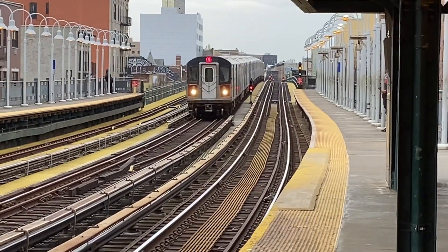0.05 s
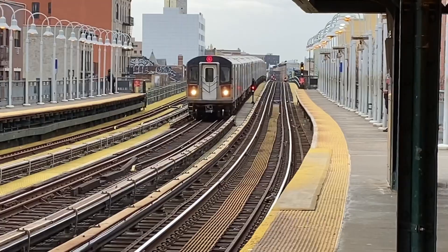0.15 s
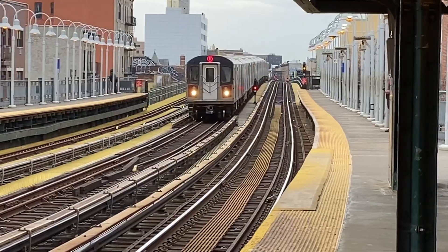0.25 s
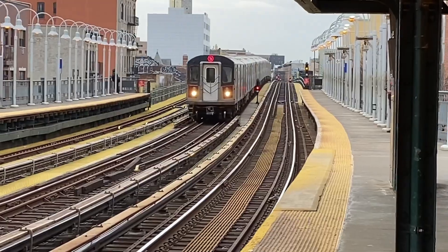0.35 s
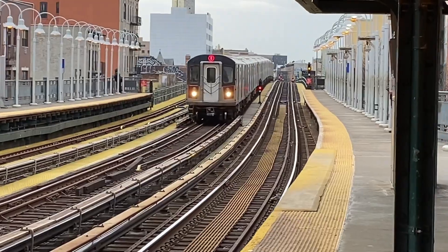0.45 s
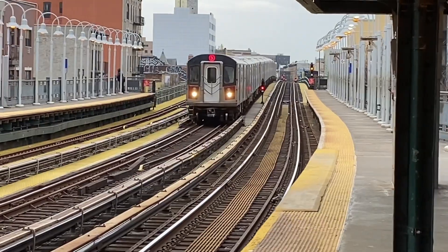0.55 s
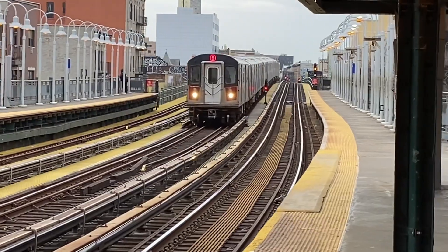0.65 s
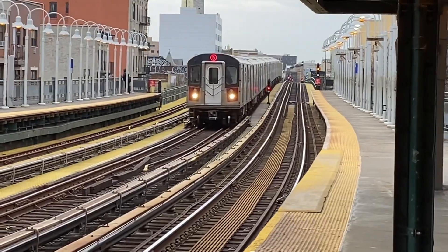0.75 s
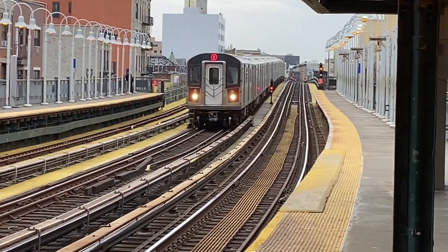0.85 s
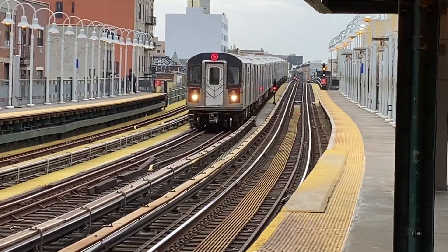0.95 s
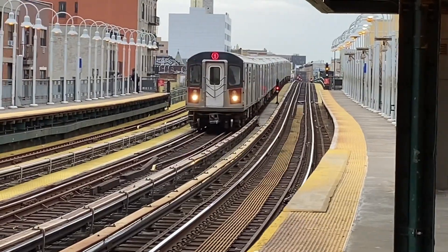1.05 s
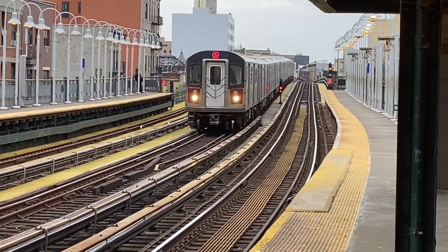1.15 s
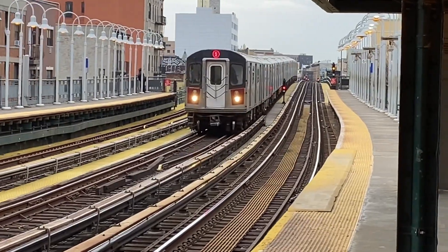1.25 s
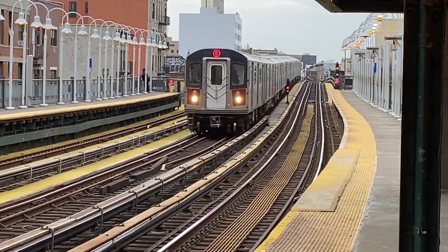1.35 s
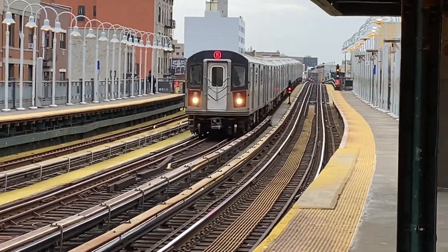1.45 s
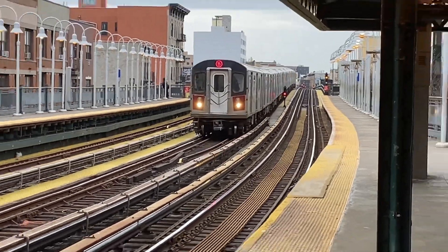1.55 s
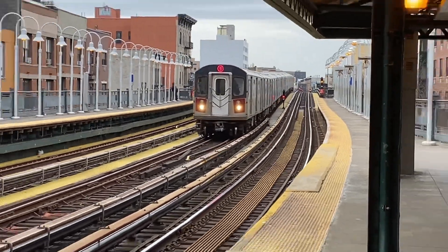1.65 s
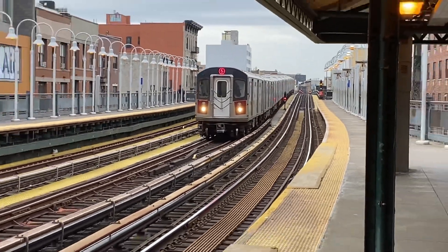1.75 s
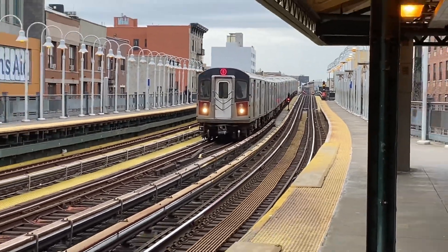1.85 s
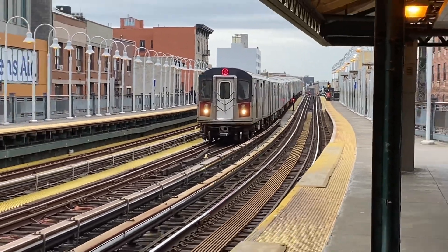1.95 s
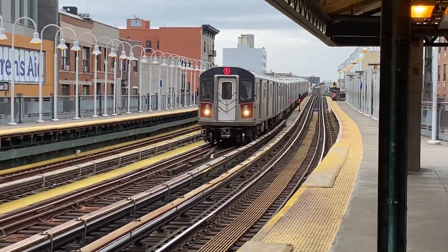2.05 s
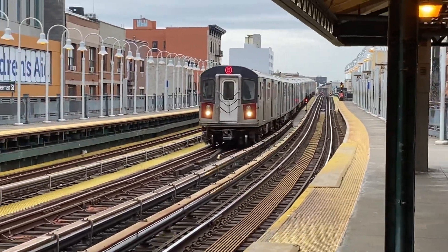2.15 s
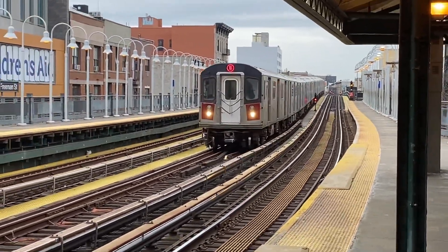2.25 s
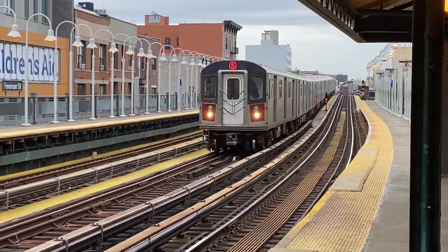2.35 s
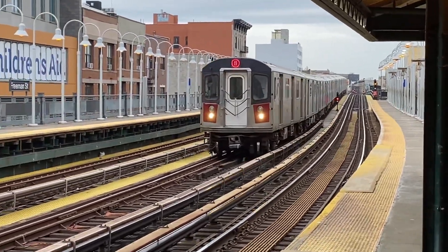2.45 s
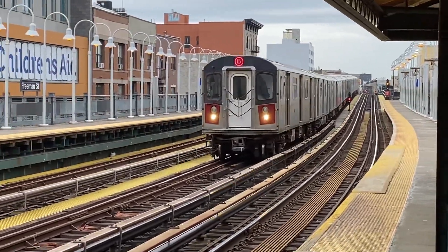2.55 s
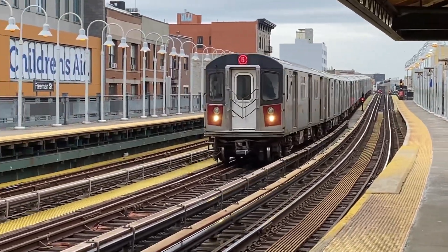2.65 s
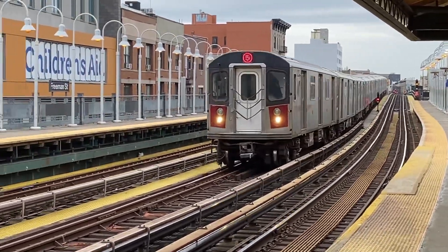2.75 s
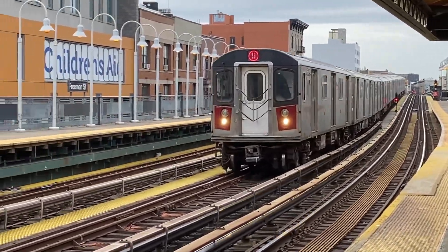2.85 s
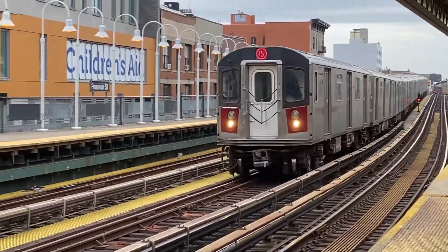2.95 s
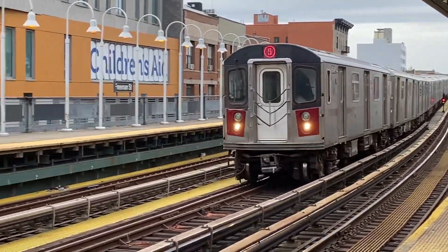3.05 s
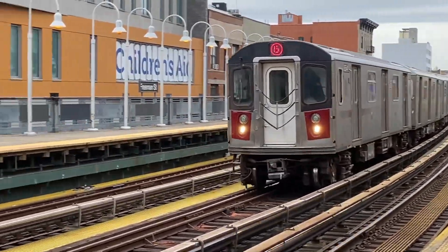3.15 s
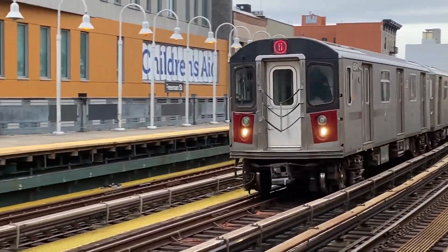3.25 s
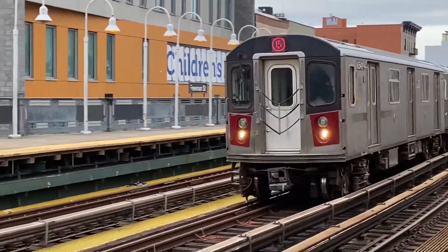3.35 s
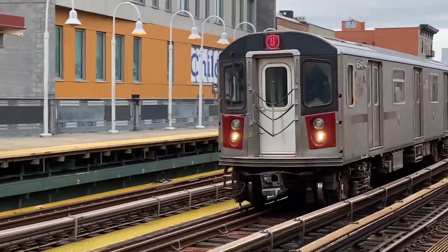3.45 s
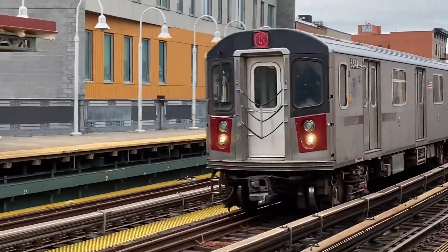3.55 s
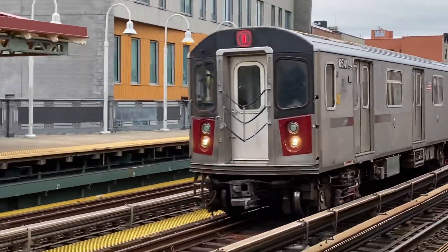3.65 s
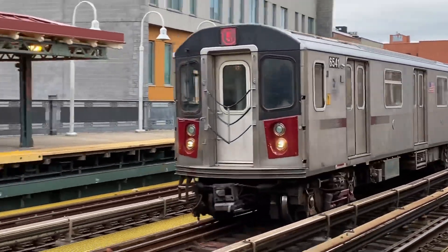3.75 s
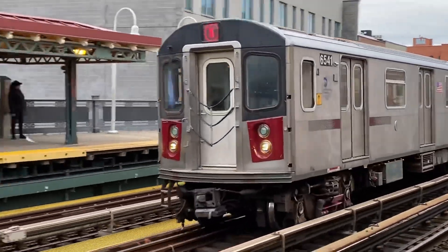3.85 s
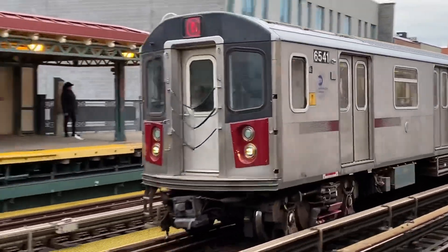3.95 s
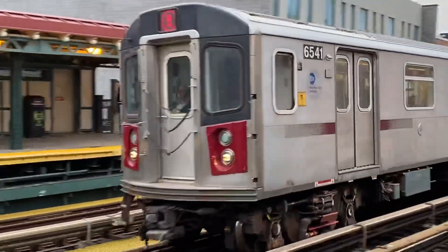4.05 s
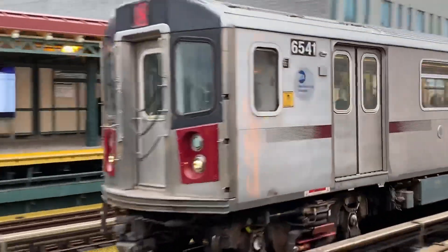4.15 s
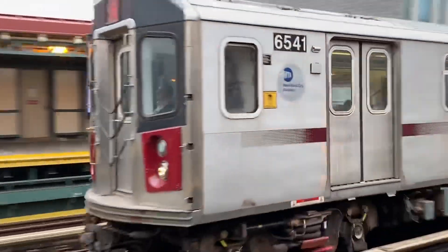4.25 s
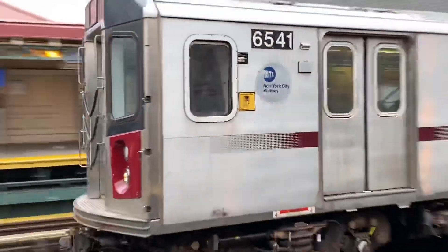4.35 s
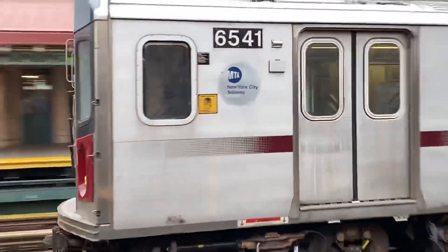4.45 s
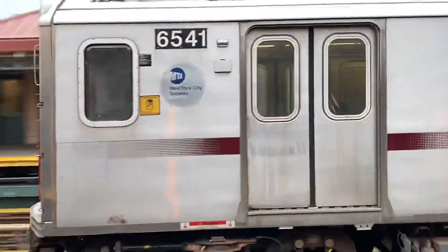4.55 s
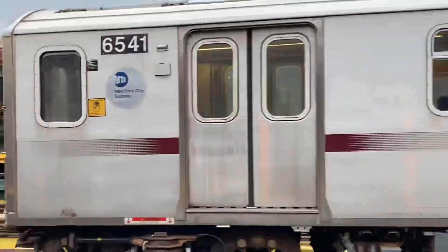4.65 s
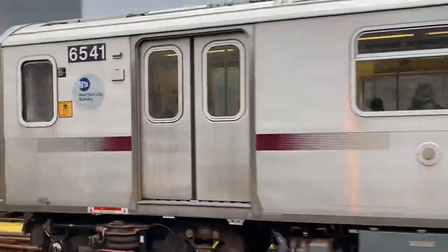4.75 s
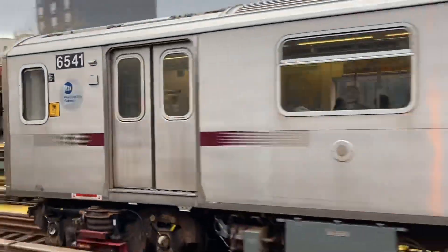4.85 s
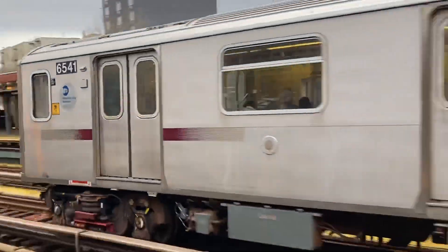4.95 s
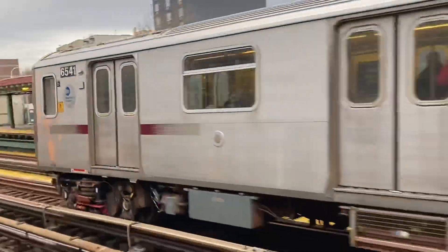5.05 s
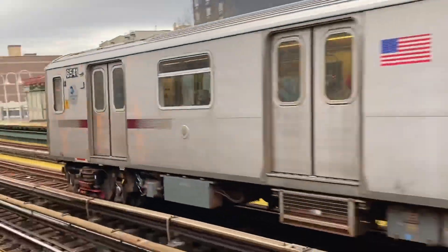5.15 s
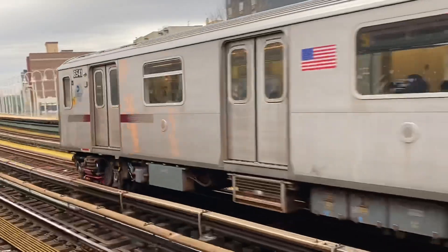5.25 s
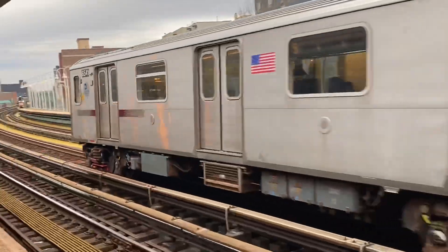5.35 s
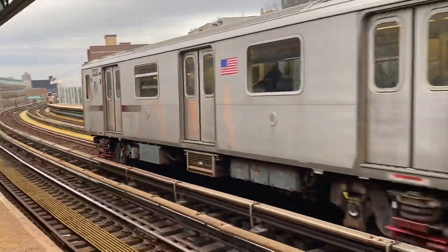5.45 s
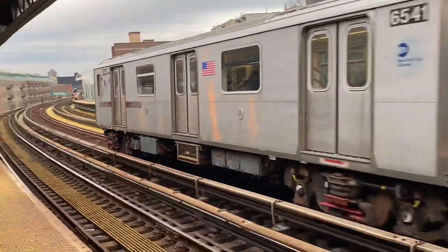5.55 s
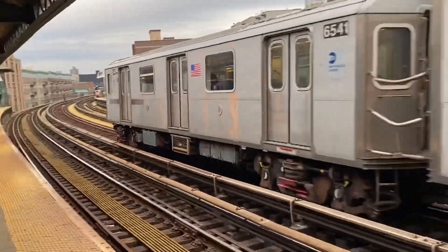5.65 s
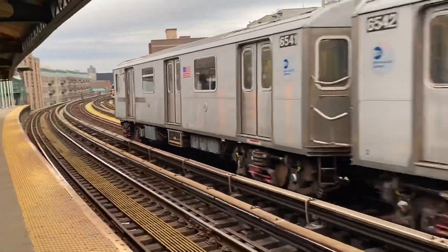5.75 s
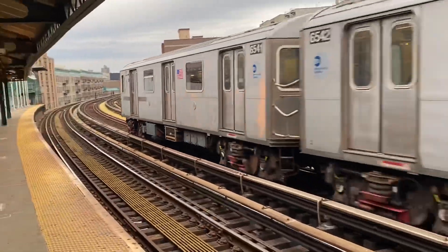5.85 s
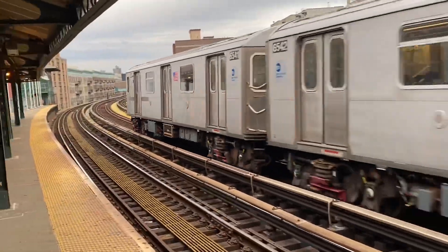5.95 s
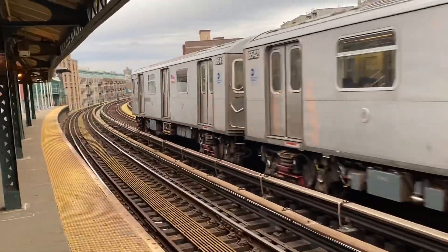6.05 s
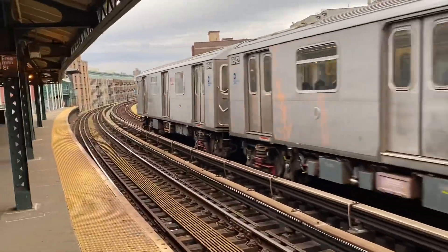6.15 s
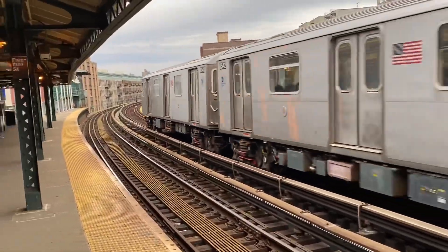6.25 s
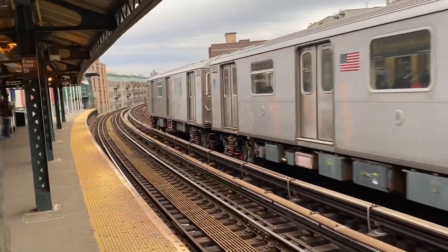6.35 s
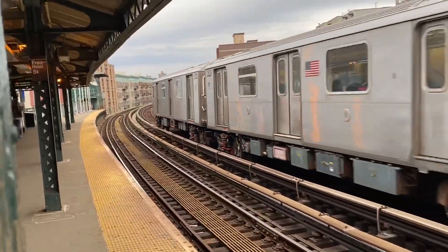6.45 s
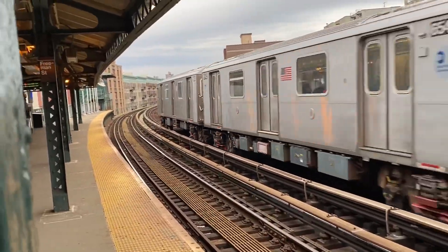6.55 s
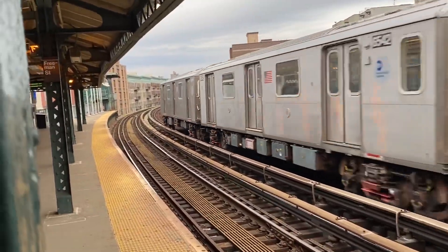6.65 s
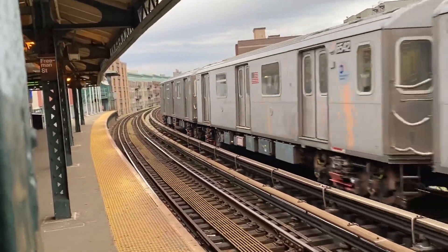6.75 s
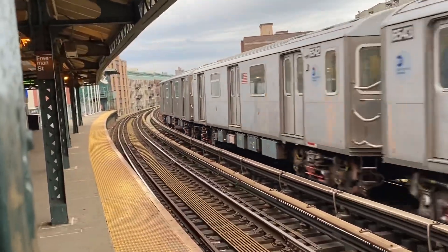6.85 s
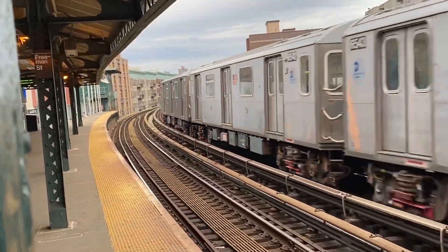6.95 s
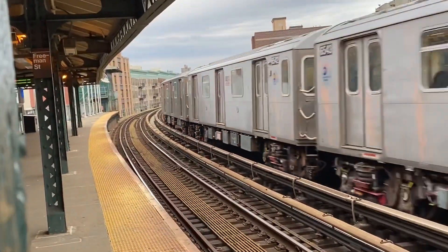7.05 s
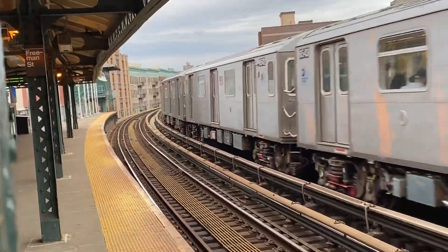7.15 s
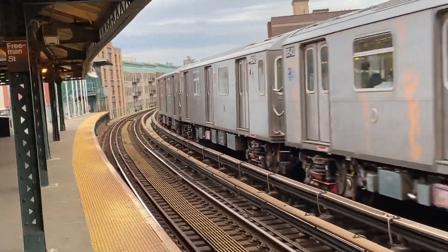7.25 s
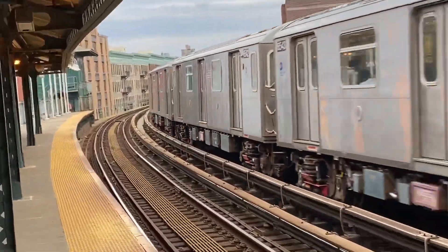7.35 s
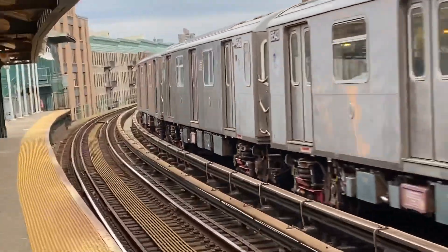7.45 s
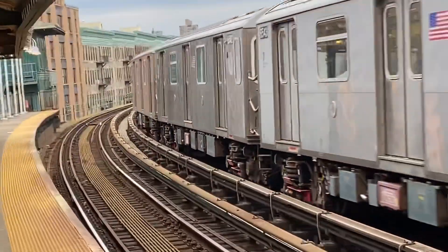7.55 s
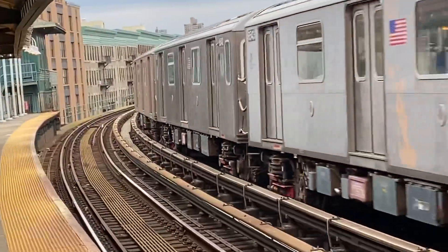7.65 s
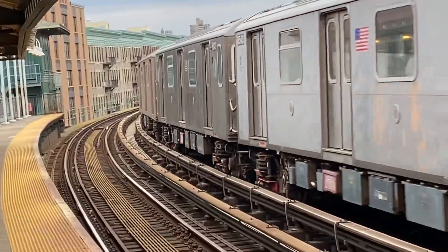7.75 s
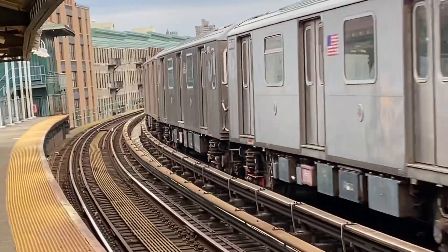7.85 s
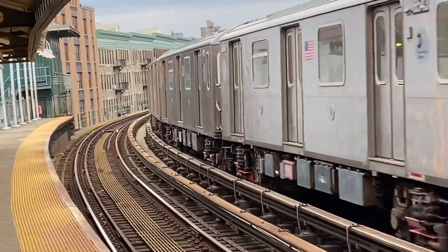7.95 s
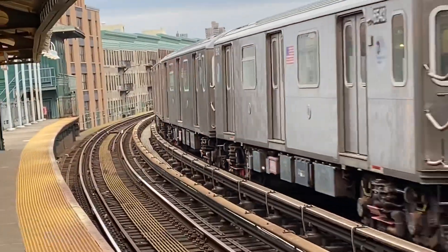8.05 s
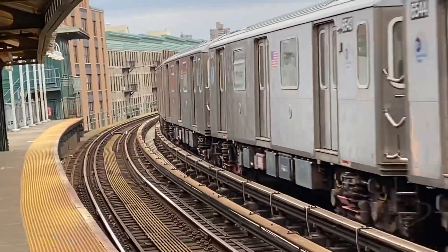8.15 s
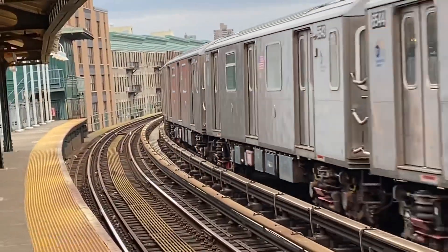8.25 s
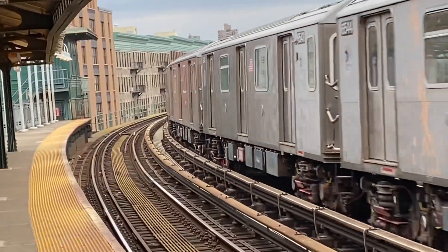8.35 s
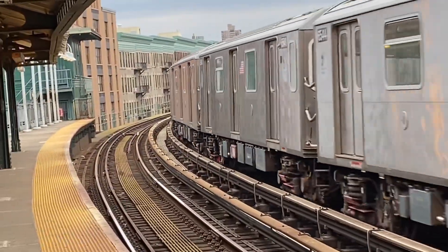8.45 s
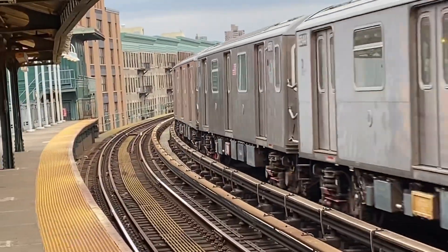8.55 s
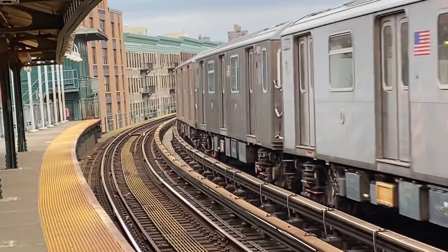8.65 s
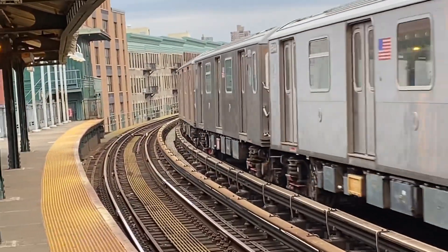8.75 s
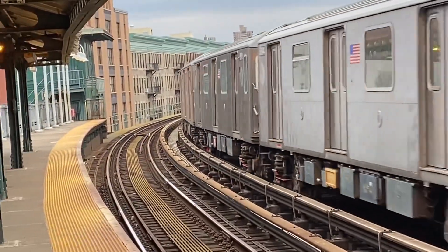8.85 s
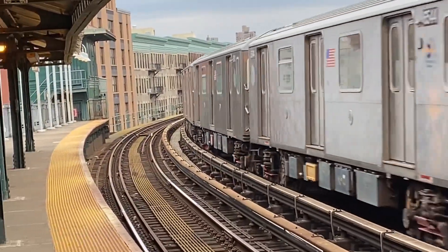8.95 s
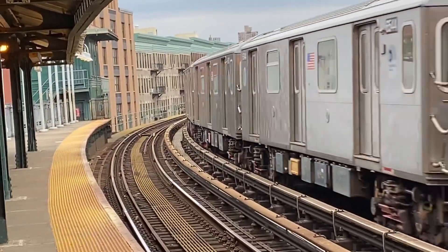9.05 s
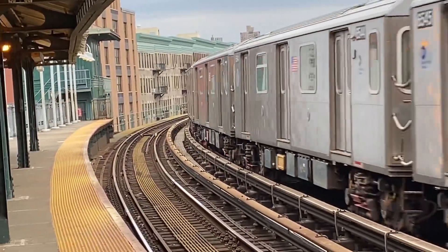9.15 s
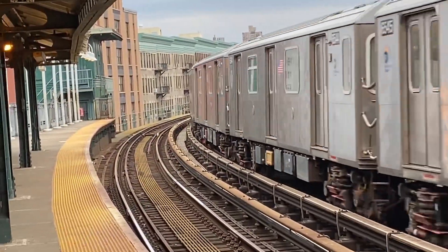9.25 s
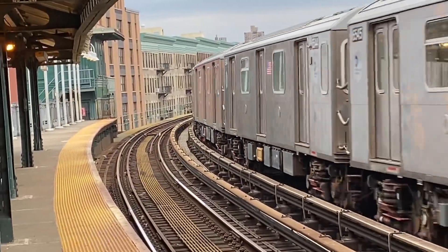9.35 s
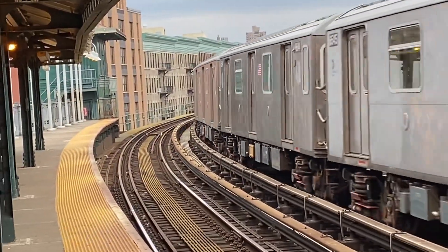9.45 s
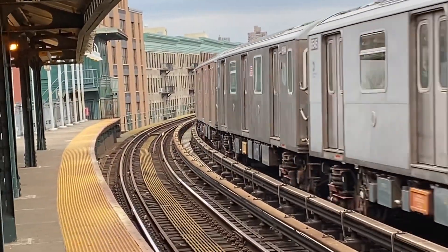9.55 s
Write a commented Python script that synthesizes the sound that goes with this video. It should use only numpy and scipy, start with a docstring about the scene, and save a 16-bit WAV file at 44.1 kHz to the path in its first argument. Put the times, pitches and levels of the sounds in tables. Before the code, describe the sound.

Stereo microphone beside a curved steel viaduct outdoors. A train starts far off as a soft low hum, girder rumble and muffled rail knocks. It swells and brightens, reaching the platform with hard metallic bangs, then passes continuously: midrange roar, gritty wheel hiss, irregular double clacks and clanking undercarriage. Tiny high squeaks and bursts of steel sizzle colour the later cars; the train is still passing at the end.

```python
"""On a platform beside an elevated steel viaduct, a subway train comes round a curve and rolls past.
Filtered noise makes the rumbling girders, roaring deck and hissing rails; wandering tones make the deck boom.
Each two-axle truck clacks twice over a rail joint, and its blows set steel parts and wheels ringing.
Wheel flanges sizzle, sing and squeak on the curve: noise and high ringing modes that flare up and die.
Beneath it all, one low, slightly wavering tone is the hum of the first car as it nears."""
import sys
import numpy as np
from scipy import signal
from scipy.fft import rfft, irfft, next_fast_len
from scipy.io import wavfile

SR = 44100
rng = np.random.default_rng(int(sys.argv[2]) if len(sys.argv) > 2 else 0)


def wav_record(signal):
    """Record a signal, one row per channel, as 16-bit PCM in the file named by sys.argv[1]."""
    frames = np.transpose(np.atleast_2d(signal))
    bounded = np.clip(frames, -1, 1)
    # unit amplitude maps onto the largest positive 16-bit level
    quanta = np.round(bounded * 32767).astype(np.int16)
    wavfile.write(sys.argv[1], SR, quanta)


N = 422919
TIME = np.arange(N) / SR

# how far off the nearest wheels are: start_s, distance_m
DISTANCE = [(0, 63), (1.5, 55), (2.9, 33), (3.4, 22), (4.2, 8.3), (9.59, 2.8)]
# rolling noise before each source's own trim: start_s, deck_roar_db, rail_ring_db, wheel_hiss_db
ROLLING = [(0, -28, -32.5, -35.5), (1.03, -26.5, -31.5, -33), (1.22, -22.5, -28, -31),
           (1.75, -22, -28, -31), (2.2, -18, -25, -28.5), (2.95, -18.5, -23, -28), (3.8, -18, -22, -28),
           (4.3, -19, -18.5, -25), (4.55, -22.5, -23.5, -29), (4.8, -19.5, -21, -25.5),
           (5.3, -20.5, -25.5, -28.5), (6.0, -18.5, -25, -27.5), (6.48, -22, -26.5, -28.5),
           (6.75, -19, -25.5, -26.5), (8.3, -19, -26, -27.5), (9.59, -18.5, -24, -26)]
# colour of the deck's roar: pitch_hz, level_db (per Hz)
DECK = [(110, -24.5), (175, -2.5), (210, -1.5), (255, 2.5), (340, 1.5), (400, -0.5), (490, -3.5), (560, -7),
        (800, -24.5)]
# colour of the rails' noise: pitch_hz, level_db (per Hz)
RAILS = [(380, -46), (570, 0.5), (780, 0.5), (980, -4), (1200, -6.5), (1450, -8), (2200, -30.5)]
# colour of the flanges' sizzle: pitch_hz, level_db (per Hz)
SIZZLE = [(4500, -3), (6800, 9), (8500, -13), (10000, 8), (12000, 1.5), (14000, 6), (16000, 0.5)]
# colour of a clack: pitch_hz, level_db (per Hz)
CLACK = [(700, -19), (1400, 2), (2400, 2), (4200, 0), (6500, -7), (8500, -12.5), (16000, -35)]
# ways a wheel rings: pitch_hz, level_db, t60_s (time to fall by 60 dB, before any damping by the rail)
WHEEL = [(1816, 5, 0.2), (2450, -12, 0.38), (2780, 3, 0.17), (3296, 2, 0.45), (4070, -15, 0.15),
         (4250, -3.5, 0.49), (5060, -6, 0.16), (5810, -4, 0.18), (6630, -18.5, 0.2), (7500, -4, .12)]
WHEELS_DIFFER = 0.0299   # spread of pitch from wheel to wheel, as a share


def from_db(db):
    """Turn decibels into gain."""
    return 10 ** (np.asarray(db) / 20)


def rms_one(x):
    """Scale a sound to an average power of 1."""
    return x / np.sqrt(np.mean(x ** 2))


def in_time(rows):
    """Join the points of each column by straight lines, sample by sample."""
    s, *columns = np.transpose(rows)
    return [np.interp(TIME, s, column) for column in columns]


def filtered(x, gain_at):
    """Filter a sound by a gain given as a function of frequency."""
    size = next_fast_len(N, real=True)
    hz = np.maximum(np.arange(size // 2 + 1) * SR / size, 1)
    return irfft(rfft(x, size) * gain_at(hz), size)[..., :N]


def at_hz(points, hz):
    """Read a table of levels along a logarithmic frequency axis."""
    knots, values = np.transpose(points)
    return np.interp(np.log(hz), np.log(knots), values)


def noise(spectrum):
    """Two unrelated noises of one colour, falling steeply beyond its ends."""
    low, high = spectrum[0][0], spectrum[-1][0]

    def colour(hz):
        edges = np.minimum(1, np.minimum(hz / low, high / hz)) ** 4
        return from_db(at_hz(spectrum, hz)) * edges

    return rms_one(filtered(rng.standard_normal((2, N)), colour))


def drift(rate):
    """Smooth chance: random points of spread 1, rate of them a second, joined by lines."""
    knots = rng.standard_normal(N // 16)
    return np.interp(TIME * min(rate, SR / 20), np.arange(len(knots)), knots)


def resonance(hz, width_hz):
    """A randomly driven mode: a tone that wanders in strength and phase; its centre may move."""
    swing = np.array([drift(width_hz) + 1j * drift(width_hz) for side in range(2)])
    turns = np.cumsum(hz * np.ones(N)) / SR
    return rms_one(np.real(swing * np.exp(2j * np.pi * turns)))


def steadied(tone, knee=2.0):
    """Friction damps the widest swings of a mode."""
    swing = np.abs(signal.hilbert(tone, next_fast_len(N))[:, :N])
    return rms_one(tone / np.sqrt(1 + (swing / knee) ** 2))


def blows(times, heights):
    """One click for each blow."""
    clicks = np.zeros(N)
    clicks[np.clip(np.round(times * SR).astype(int), 0, N - 1)] = heights
    return clicks + 1e-18   # an inaudible offset, so that no sample is exactly zero


def dying(clicks, t60, rise=0):
    """Envelope that rises at each click and dies away by 60 dB in t60 seconds."""
    power = signal.lfilter([1], [1, -from_db(-120 / (t60 * SR))], clicks ** 2)
    keep = np.exp(-1 / (rise * SR + 1))
    return signal.lfilter([1 - keep], [1, -keep], np.sqrt(power))


def ring(clicks, hz, t60):
    """A mode of a solid body: a click of height 1 sets a dying sine of height 1 ringing."""
    r, w = from_db(-60 / (t60 * SR)), 2 * np.pi * hz / SR
    return signal.lfilter([0, np.sin(w)], [1, -2 * r * np.cos(w), r * r], clicks)


def slip_rings(per_s, low_hz, high_hz, t60, count=40):
    """Random slips and taps, each ringing one of many modes for a moment."""
    slips = rng.random((int(per_s * N / SR), 4))
    times = slips[:, 0] * N / SR
    dealt = (slips[:, 1] * count).astype(int)   # which mode each slip rings
    heights = from_db(12 * slips[:, 2]) * np.sign(slips[:, 3] - .5)
    pitches = np.geomspace(low_hz, min(high_hz, SR / 2.5), count)
    pitches = pitches * (1 + 0.0144 * rng.standard_normal(count))
    return rms_one(sum(ring(blows(times[dealt == k], heights[dealt == k]), hz, t60)
                       for k, hz in enumerate(pitches)))


def swell(s, attack_s, release_s, time=TIME):
    """A rounded rise to 1 at time s, and a fall."""
    stretch = np.where(time < s, attack_s, release_s)
    return np.exp(-np.minimum(((time - s) / stretch) ** 2, 50))


def with_swells(level_db, swells):
    """Gain of a base level with swells (s, dB, attack s, release s) added in power."""
    coarse = TIME[::64]   # swells are slow, so every 64th sample is enough
    power = sum((from_db(db) * swell(s, attack, release, coarse)) ** 2 for s, db, attack, release in swells)
    return np.sqrt(from_db(level_db) ** 2 + np.interp(TIME, coarse, power))


def rolling():
    """Gains of deck, rails and wheels: rolling noise plus jolts of the leading trucks on rough track."""
    # jolts: start_s (their peak), deck_roar_db, rail_ring_db, wheel_hiss_db
    jolts = [(2.7, -37, -26, -33), (2.9, -21, -36, -48), (3.33, -32, -19.5, -22.5), (3.68, -24, -23, -45),
             (3.99, -15, -19.5, -22.5), (4.22, -32, -27, -36), (4.37, -17, -30, -34)]
    attack_s, release_s = 0.079, 0.14
    return [with_swells(level_db, [(s, dbs[k], attack_s, release_s) for s, *dbs in jolts])
            for k, level_db in enumerate(in_time(ROLLING))]


def viaduct(roar, rail, carry_m=25, surge_db=1.3):
    """Rough wheels shake the rails, the deck and the girders beneath."""
    # rumble of the girders: start_s, level_db
    rumble = [(0, -26.5), (1.5, -24.5), (2.3, -23), (3.2, -20.5), (3.85, -24.5), (4.7, -26.5), (5.4, -24),
              (8.1, -25.5), (9.59, -24)]
    # colour of that rumble: pitch_hz, level_db (per Hz)
    girder_colour = [(20, -35), (32, -10), (47, 1.5), (70, 3), (105, 1.5), (150, 1), (190, -4), (280, -68)]
    girders = from_db(in_time(rumble)[0]) * noise(girder_colour)
    deck = roar * from_db(-0.5 + surge_db * drift(12)) * noise(DECK)
    rails = rail * from_db(-0.97 + 1.0 * drift(30)) * noise(RAILS)
    # two modes travel well along the track and stand out while the train is far
    far = 1 - np.exp(-in_time(DISTANCE)[0] / carry_m)
    ahead = rail * from_db(-6.5) * resonance(hz=1123, width_hz=240)
    ahead = ahead + roar * from_db(-11.0) * resonance(hz=145.8, width_hz=80)
    # a low mode of the span throbs as the train rolls onto it
    throb = from_db(-28.5) * swell(2.98, attack_s=0.53, release_s=0.53) * resonance(hz=58, width_hz=16)
    return girders + throb + deck + rails + deck_boom() + far * ahead


def deck_boom():
    """Two rough deck modes swell under the trucks and shift in pitch with where the load sits."""
    # swells of the stronger mode: start_s (their peak), level_db, half_length_s, pitch_hz (before it wanders)
    booms = [(3.35, -18.5, 0.041, 478.7), (3.433, -12.5, 0.067, 441.7), (3.682, -16, 0.048, 439),
             (4.088, -17, 0.081, 453.6), (4.28, -24, 0.27, 449), (6.07, -19.5, 0.042, 446),
             (7.987, -19.5, 0.11, 441.5), (8.248, -17.5, 0.077, 459.4), (8.9, -22.5, 0.15, 440.7),
             (9.167, -22.5, 0.094, 474)]
    under_roar_db, loss_db_per_m = -11, 0.05   # level between the swells; weaker while the train is far
    wander_hz, rough_db = 11, 3.5
    lower_ratio, lower_db = .75, -7   # a second deck mode moves with the first
    base_db = in_time(ROLLING)[0] + under_roar_db - loss_db_per_m * in_time(DISTANCE)[0]
    gain = with_swells(base_db, [(s, db, half, half) for s, db, half, hz in booms])
    hz = in_time(booms)[2] + wander_hz * drift(14)
    modes = steadied(resonance(hz, width_hz=70))
    modes = modes + from_db(lower_db) * resonance(hz * lower_ratio, width_hz=80)
    return gain * from_db(rough_db * np.tanh(drift(70))) * modes


def panels(roar):
    """Plates and stringers of the deck are knocked at random and ring briefly."""
    plates = np.array([slip_rings(per_s=83, low_hz=130.7, high_hz=538.8, t60=0.38, count=20)
                       for side in range(2)])
    return roar * from_db(-10) * plates


def wheel_hiss(level_db=-0.78, air_db_per_m=0.95, air_power=2.58):
    """Gritty rolling contact and wheel ring; air takes away their top with distance."""
    # colour of the hiss: pitch_hz, level_db (per Hz)
    hiss_colour = [(900, -8.5), (1500, -0.5), (1900, 2.5), (2500, 1), (3200, -1), (4200, -5), (5500, -6.5),
                   (7200, -10.5), (8200, -11), (10000, -64), (16000, -52)]
    hiss = noise(hiss_colour) * from_db(0.14 * drift(35) + 0.71 * drift(400))
    hiss = hiss + from_db(-11.5) * grinding()
    distance, out = in_time(DISTANCE)[0], 0
    centres = np.geomspace(1500, 15000, num=7)
    # overlapping bands that add up to the whole, each with its own loss in the air
    for centre, share in zip(centres, np.eye(len(centres))):
        band = filtered(hiss, lambda hz: np.interp(hz, centres, share))
        loss_db = air_db_per_m * distance * (centre / centres[-2]) ** air_power
        out = out + band * from_db(1.0 * drift(20) - loss_db)
    return from_db(level_db) * out


def grinding(surge_db=-1.0, damping=3.4):
    """Rolling keeps the modes of two unlike wheels ringing in surges, damped by the rail."""
    rough, out = rng.standard_normal(N), 0
    for hz, db, t60 in WHEEL:
        drive = rough * from_db(db + surge_db * np.tanh(drift(6.3)))
        out = out + sum(ring(drive, hz * (1 + WHEELS_DIFFER * size), t60 / damping) for size in (-.5, .5))
    return rms_one(out)


def rail_joints(air_db_per_m=1.0):
    """Each axle drops into a gap: a crack, rattling gear, a ringing wheel and a knock in the rail."""
    times, peak_db, treble_db, knock_db, clank_hz = axles()
    distance = np.interp(times, *np.transpose(DISTANCE))
    hits = blows(times, from_db(peak_db))
    crack = from_db(-11.5) * dying(hits, t60=0.018)
    flutter = from_db(0.77 * np.tanh(drift(280)))
    rattle = from_db(-9.5) * dying(hits, t60=0.31, rise=0.0024) * flutter
    clack = noise(CLACK) * (crack + rattle)
    treble_hits = blows(times, from_db(peak_db + treble_db - air_db_per_m * distance))
    spray = from_db(10.5) * noise(SIZZLE) * dying(treble_hits, t60=0.21, rise=.0008)
    # the rail answers almost at once; the heavy deck takes a few milliseconds to get going
    knocks = blows(times, from_db(knock_db))
    knock = from_db(1.5) * noise(RAILS) * dying(knocks, t60=0.22, rise=0.00082)
    thud = from_db(6.0) * noise(DECK) * dying(knocks, t60=0.15, rise=0.0071)
    parts = clanks(times, peak_db, clank_hz) + from_db(-25.0) * struck_wheels(times, peak_db)
    return clack + spray + knock + thud + parts


def axles():
    """The two axles of a truck follow each other by spacing over speed; the train gathers speed."""
    # a truck crosses a joint; levels before each layer's trim:
    # start_s, clack_peak_db, second_axle_db (over the first), treble_db (over the clack), knock_db,
    # first_clank_hz, second_clank_hz
    trucks = [(0.271, -30, -12, -43, -28, 1920, 1900), (0.651, -28, -1, -36, -31, 1904, 2000),
              (1.023, -26.5, -2, -43, -26.5, 4250, 1900), (1.192, -31, -1.5, -42, -21, 2000, 1990),
              (1.403, -22, -3.5, -35, -28, 4170, 4170), (1.76, -29, -6, -44, -32, 3220, 1900),
              (1.935, -22.5, -6, -28, -27, 4030, 4300), (2.189, -23.5, -3, -35, -24.5, 2040, 2000),
              (2.413, -19.5, 1, -29, -28, 1553, 1910), (3.142, -10, -1.5, -5.5, -20, 4310, 1930),
              (3.381, -16, -15, -33, -30, 2720, 2700), (3.504, -15.5, -4, -10, -37, 4300, 4300),
              (3.945, -10.5, -18, -14, -19, 1550, 2300), (4.228, -14.5, -3, -13, -26, 6580, 2400),
              (4.672, -16, 0.5, -21, -23.5, 2370, 2220), (4.918, -14.5, -3, -19.5, -21.5, 2600, 2400),
              (5.207, -17, 0, -20, -21.5, 6700, 2560), (5.484, -15, -16, -23, -23.5, 2620, 2580),
              (5.645, -15.5, 2, -28, -22.5, 2412, 3930), (6.173, -22, 0, -18, -45, 2240, 2280),
              (6.322, -18, 2, -24, -25, 3940, 2730), (6.607, -15, 1, -32, -23, 3580, 3520),
              (7.131, -25, 1, -14, -25.5, 2500, 2500), (7.277, -16.5, 0.5, -25, -30, 4330, 4000),
              (7.562, -16, 2, -29, -24, 2410, 2240), (8.083, -20.5, -8, -18, -27, 6460, 2495),
              (8.229, -16, 1, -26, -30, 4320, 3930), (8.511, -16, 3.5, -31, -24, 2396, 2590),
              (8.747, -20.5, 3, -29, -32, 2510, 2800), (9.172, -17, 0.5, -32, -26, 4300, 2250),
              (9.453, -13.5, 0, -33, -29, 3605, 2620)]
    spacing_m, speed_m_per_s, speeds_up_at_s, acceleration_m_per_s2 = 2.08, 15.5, 3.5, .26
    s, peak_db, second_db, treble_db, knock_db, first_hz, second_hz = np.transpose(trucks)
    speed = speed_m_per_s + acceleration_m_per_s2 * np.maximum(s - speeds_up_at_s, 0)
    first = [s, peak_db, treble_db, knock_db, first_hz]
    second = [s + spacing_m / speed, peak_db + second_db, treble_db, knock_db + second_db, second_hz]
    return np.hstack([first, second])


def clanks(times, levels_db, pitches, count=9):
    """Each blow rings a knot of close modes in a steel part, which bounces and rings again more softly."""
    trim_db, t60_s, spread = -11, 0.091, 0.1067   # spread of the modes as a share of the pitch
    rebound_s, rebound_db = .016, -2.5            # the delay varies by up to half either way
    out, age = np.zeros(N + SR), np.arange(SR // 5) / SR
    chances = rng.uniform(-1, 1, (len(times), 2, count + 1))
    for s, db, hz, luck in zip(times, levels_db, pitches, chances):
        for delay, loss_db, (jitter, *offsets) in zip((0, rebound_s), (0, rebound_db), luck):
            modes = hz * (1 + spread * (np.linspace(-1, 1, count) + .5 * np.array(offsets)))
            sines = np.sin(2 * np.pi * np.outer(modes, age))
            tone = np.sign(offsets) @ sines / np.sqrt(count / 2)
            start = int((s + delay * (1 + .5 * jitter)) * SR)
            out[start:start + len(age)] += from_db(trim_db + db + loss_db - 60 * age / t60_s) * tone
    return out[:N]


def struck_wheels(times, peak_db, uneven_db=5, count=3):
    """Blows fall on wheels of unlike size, each at another spot, so the modes answer unevenly."""
    luck = uneven_db * (2 * rng.random((len(times), len(WHEEL))) - 1)
    out = 0
    for w in range(count):   # each wheel takes every third blow
        for k, (hz, db, t60) in enumerate(WHEEL):
            heights = from_db(peak_db + db + luck[:, k])
            hits = blows(times[w::count], heights[w::count])
            out = out + ring(hits, hz * (1 + WHEELS_DIFFER * (w - 1)), t60)
    return out


def flanges():
    """Steel rubs sideways on the curve: a sizzle in which high wheel modes flare up and die."""
    # base level of the rubbing: start_s, level_db
    rubbing = [(0, -70), (1.7, -64), (2.5, -53), (3.4, -47), (4.7, -43), (8.0, -42), (9.59, -43)]
    # a flange presses harder and the sizzle flares: start_s (its peak), level_db, half_length_s
    flares = [(0.872, -50.5, 0.11), (4.05, -39, 0.18), (5.43, -41, 0.068), (6.08, -41.5, 0.16),
              (6.346, -33.5, 0.1), (6.697, -35, .06), (7.04, -41, 0.076), (8.59, -35, .05),
              (8.754, -33.5, 0.07), (8.999, -36, 0.12), (9.209, -32.5, .04), (9.522, -34, 0.097)]
    # high wheel modes that the flanges excite: pitch_hz, width_hz, level_db (against each other)
    squeal = [(6300, 210, -11), (7560, 160, -12), (8300, 400, 9), (10800, 500, -5), (11700, 700, 9),
              (15000, 600, 1)]
    tones = sum(from_db(db + 7.2 * np.tanh(drift(8.4))) * resonance(hz, width) for hz, width, db in squeal)
    sizzle = noise(SIZZLE) * from_db(1.2 * drift(11.0) + 0.78 * drift(900))
    flecks = slip_rings(per_s=130, low_hz=6100, high_hz=15550, t60=0.095)
    pressure = with_swells(in_time(rubbing)[0], [(s, db, half, half) for s, db, half in flares])
    rub = sizzle + from_db(-10) * rms_one(tones) + from_db(-7.5) * flecks
    # one short hiss from the train while it is still far
    far_colour = [(5200, -1), (6700, -2), (8200, -18), (10000, -20)]
    far_hiss = from_db(-43.5) * swell(0.856, attack_s=0.13, release_s=0.13) * noise(far_colour)
    return pressure * from_db(0.1) * rub + far_hiss


def singing():
    """Thin, breathy ring of wheels rubbing on the curve: narrow, randomly driven modes."""
    # start_s (its peak), pitch_hz, level_db, half_length_s, width_hz
    songs = [(1.6, 4200, -52, .6, 329), (2.25, 5720, -51, .6, 415), (3.21, 3290, -34, 0.077, 90),
             (3.97, 7500, -38, 0.087, 600)]
    return sum(from_db(db) * swell(s, half, half) * resonance(hz, width) for s, hz, db, half, width in songs)


def squeaks():
    """A wheel slips and one of its modes sings for a moment, slightly wavering in pitch."""
    # start_s (its peak), pitch_hz (before it wavers), level_db, half_length_s
    slips = [(3.166, 3225, -21, 0.0092), (3.646, 4360, -34, .015), (4.603, 8400, -38, .015),
             (5.218, 6680, -28, 0.01), (5.245, 14460, -36, .013), (6.365, 15050, -29, .015),
             (6.424, 10700, -35, 0.015), (7.722, 15116, -41, .012), (8.785, 11960, -34, .015),
             (9.035, 6440, -25, 0.012)]
    waver_hz = 24.2
    out, waver = np.zeros(N), np.cumsum(waver_hz * drift(200)) / SR
    for s, hz, db, half in slips:
        on = np.abs(TIME - s) < 3 * half
        tone = np.sin(2 * np.pi * (hz * TIME[on] + waver[on]))
        out[on] += from_db(db) * swell(s, half, half, TIME[on]) * tone
    return out


def extra_clanks():
    """Extra steel clanks, some right beside a joint blow, others between joints."""
    # start_s, level_db (before the clank's trim), pitch_hz
    extra_blows = [(0.469, -32, 3300), (1.041, -25, 4230), (1.399, -18, 2050), (1.776, -18, 3270),
                   (3.152, -12, 2890), (3.216, -13, 3300), (3.847, -19, 2820), (3.994, -10, 2294),
                   (4.633, -16, 4150), (5.553, -16, 5600), (5.672, -16, 2600), (6.589, -20, 3620),
                   (7.799, -14, 2560), (7.933, -16, 2410), (7.988, -17, 2400), (8.206, -16, 2405)]
    return clanks(*np.transpose(extra_blows))


def loose_gear(per_s=36, spread_db=14):
    """Shoes, chains and brake rigging chatter at random under the cars."""
    taps = rng.random((int(per_s * N / SR), 2))
    clicks = blows(taps[:, 0] * N / SR, from_db(spread_db * taps[:, 1]))
    chatter = noise(CLACK) * dying(clicks, t60=0.085) * from_db(2.0 * np.tanh(drift(400)))
    clinks = slip_rings(per_s=140, low_hz=1793, high_hz=7530, t60=0.093, count=30)
    clinks = filtered(clinks, lambda hz: from_db(at_hz(CLACK, hz)))
    nearness = np.exp(-in_time(DISTANCE)[0] / 40)
    return nearness * (from_db(-8.0) * rms_one(chatter) + from_db(-8.0) * rms_one(clinks))


def rail_pings():
    """Blows of the far wheels run ahead along the rail as short, dull pings of two close modes."""
    # start_s, level_db (of the two modes together), pitch_hz (midway between the two)
    pings = [(0.268, -21, 1080), (0.407, -26, 1110), (0.647, -18, 1110), (0.789, -17.5, 1150),
             (1.023, -16, 976), (1.195, -14.5, 820), (1.401, -16, 1190), (1.432, -22, 900),
             (1.523, -19, 970), (2.066, -20.5, 1100), (2.413, -12, 1220), (2.747, -19, 920)]
    t60_s, split = 0.081, .025   # the modes lie this share above and below the pitch
    return sum(ring(blows(np.array([s]), .5 * from_db(db)), hz * (1 + side * split), t60_s)
               for s, db, hz in pings for side in (-1, 1))


def hum():
    """The first car's electrical gear: one unbroken low tone, slightly wavering."""
    # start_s, level_db (before it wavers)
    hum_levels = [(0, -29), (1.0, -30), (1.6, -25.5), (2.5, -28.5), (3.3, -25.5), (3.9, -30), (4.3, -39),
                  (9.59, -57)]
    pitch_hz, wander_hz, waver_db = 62.5, .3, 1.5
    phase = 2 * np.pi * np.cumsum(pitch_hz + wander_hz * drift(2.8)) / SR
    return from_db(in_time(hum_levels)[0] + waver_db * drift(4.54)) * rms_one(np.sin(phase))


def stereo(pair, stray_db=-10):
    """Left and right share one signal and oppose another, in shares set by frequency."""
    # how wide the sound is: pitch_hz, opposed_db (over the part common to both channels)
    width_points = [(60, -17), (130, -18), (260, -11), (450, -8.5), (700, -5.5), (1130, -6), (1420, -.5),
                    (1900, -5.5), (2200, -21), (2450, -33), (3300, -46), (3800, -72), (7000, -65)]
    # above 7550 Hz left and right carry one signal, the left channel delayed, plus a little stray opposed sound
    delay_above_hz, in_step_hz, left_delay_s = 7550, 11200, .000236

    def turn(hz):
        return np.pi * (in_step_hz - hz) * left_delay_s

    def common_gain(hz):
        below = 1 / np.hypot(1, from_db(at_hz(width_points, hz)))
        return np.where(hz < delay_above_hz, below, np.cos(turn(hz)))

    def opposed_gain(hz):
        below = 1 / np.hypot(1, from_db(-at_hz(width_points, hz)))
        return np.where(hz < delay_above_hz, below, from_db(stray_db) * np.sin(turn(hz)))

    mid = filtered(pair[0], common_gain)
    side = filtered(pair[1], opposed_gain)
    side = side + filtered(pair[0], lambda hz: (hz >= delay_above_hz) * 1j * np.sin(turn(hz)))
    return np.array([mid + side, mid - side])


def scene():
    """The whole train; its bass leans a little to the left."""
    roar, rail, hiss = rolling()
    train = viaduct(roar, rail) + panels(roar) + hiss * (wheel_hiss() + loose_gear())
    train = train + rail_joints() + flanges() + singing() + squeaks()
    train = train + extra_clanks() + rail_pings()
    lean_db = np.array([[.55], [-.55]])   # left, right
    return filtered(stereo(train) + hum(), lambda hz: from_db(lean_db / (1 + (hz / 800) ** 2)))


def record(dry):
    """The highest peaks are rounded and the top is cut."""
    cutoff_hz = 15700
    rounded = dry / (1 + dry ** 6) ** (1 / 6)
    return signal.sosfilt(signal.ellip(10, .1, 80, cutoff_hz, fs=SR, output="sos"), rounded)


dry = scene()
out = record(dry)
wav_record(out)
```